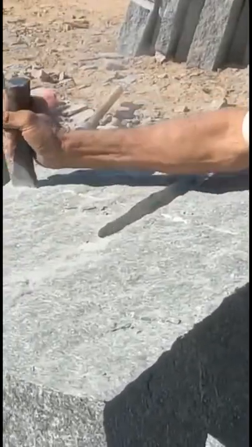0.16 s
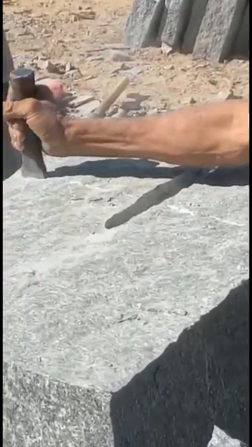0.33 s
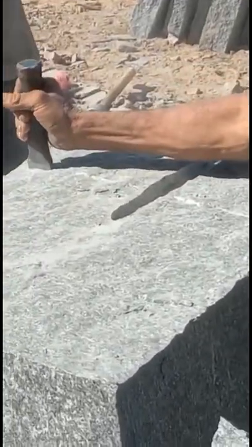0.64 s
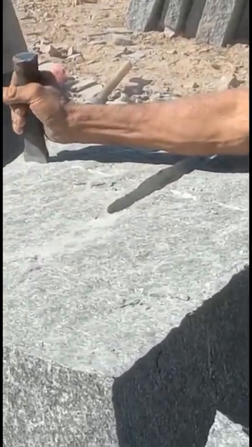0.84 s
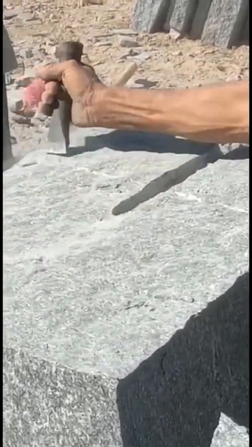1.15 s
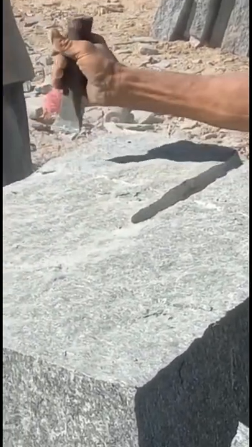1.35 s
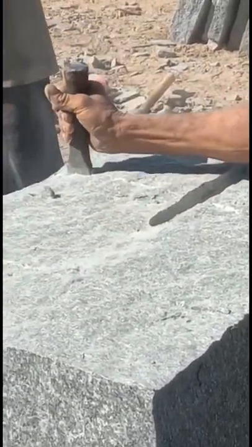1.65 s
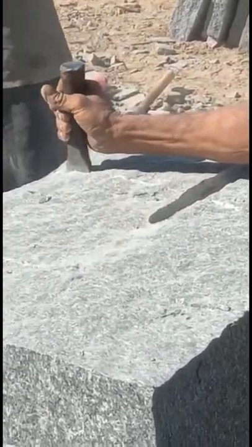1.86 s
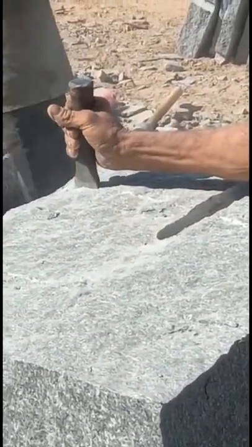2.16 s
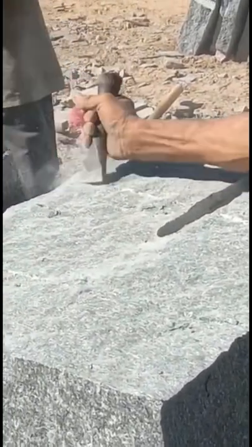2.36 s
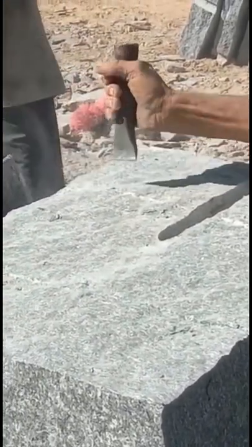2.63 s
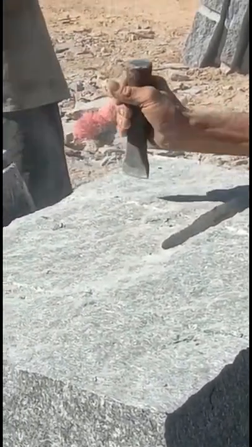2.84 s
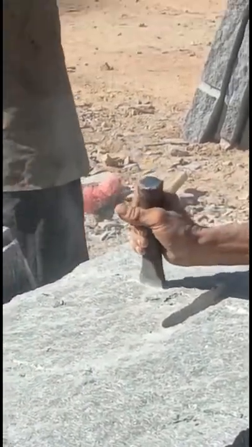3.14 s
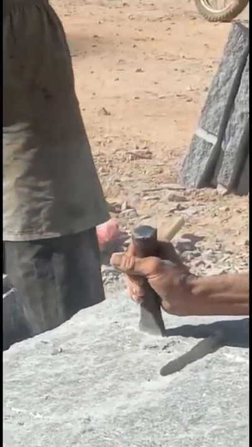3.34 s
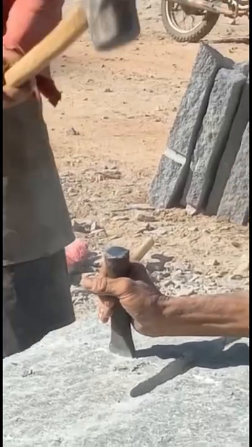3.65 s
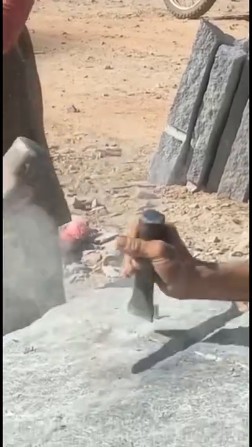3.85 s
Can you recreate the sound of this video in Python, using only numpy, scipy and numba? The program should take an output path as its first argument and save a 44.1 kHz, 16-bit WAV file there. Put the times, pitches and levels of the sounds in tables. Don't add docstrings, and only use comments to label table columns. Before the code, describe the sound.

Outdoor stone yard, close mono phone: a diesel compressor throbs low and hisses steadily some way off. The chisel clacks onto stone at 0.2 s. Sledgehammer blows crack at 1.0, 2.3 and 3.7 s, hard, clipped, with high steel ring, gritty stone crunch and brief diffuse scatter. The chisel taps at 1.1, 1.6 and 2.9-3.2; a chip clicks at 3.9. Nearby air hiss swells from about 3 s.

```python
import sys
import numpy as np
from scipy import signal
from scipy.io import wavfile
from scipy.ndimage import uniform_filter1d, minimum_filter1d
from numba import njit

SR = 44100
rng = np.random.default_rng(int(sys.argv[2]) if len(sys.argv) > 2 else 0)


def field_ratio(decibels):
    return 10 ** (np.asarray(decibels, dtype=float) / 20)


def generate_wav(sig):
    pcm = np.round(np.clip(np.atleast_2d(sig).T, -1, 1) * 32767).astype(np.int16)
    wavfile.write(sys.argv[1], SR, pcm)


N = 176400

# centre [Hz], width [Hz], level [dB].
HOUSING_MODES = [(44, 13, -20.5), (99, 15, -7), (140, 28, 0.5), (164.3, 12, -1), (258, 35, -7),
                 (320.4, 77, -7.5), (404, 31, -11), (471.6, 33, -4), (694, 50.4, -7.5), (862, 248, -12.5),
                 (1147, 57, -13.5), (1537, 730, -24)]
# centre [Hz], width [Hz], level [dB].
AIR_BANDS = [(2337, 205, 4.5), (3320, 2700, -9.5), (3890, 360, -1.5), (5660, 133, -3), (7500, 330, -11),
             (8230, 910, -4), (9500, 960, -5.5), (10350, 360, -2.5), (10970, 390, -2), (12300, 600, -4),
             (14000, 280, -21), (14500, 220, 1.5), (15300, 250, 0)]
# centre [Hz], width [Hz], level [dB].
JET_BANDS = [(2100, 590, -1.5), (3670, 1100, -5.5), (5720, 250, 1), (6740, 470, 1.5), (9200, 1400, -9.5),
             (15500, 1100, 1)]
# time [s], level [dB].
JET_FLOW_CURVE = [
    (0, -54),
    (2.4, -55),
    (2.9, -54),
    (3.3, -48),
    (3.55, -43),
    (3.8, -42),
    (4, -41),
]
# start [s], level [dB], second corner after [s], tick [dB],
# high modes [dB].
CHISEL_TAPS = [
    (0.2183, -20, 0.0059, -18, -24),
    (.325, -43, 0.0034, -10, -14),
    (1.0995, -23.5, .004, -18, -20),
    (1.5565, -27, .004, 0, 1),
    (1.605, -48, 0.0038, -7, -10),
    (1.662, -41.5, 0.0062, -8, -12),
    (2.9353, -25.5, .0035, -4, -17),
    (2.979, -56, 0.0034, 1, -1),
    (3.057, -40.5, 0.0088, -4, -14),
    (3.19, -49, 0.0033, 5, -10),
]
# frequency [Hz], level [dB], t60 [s].
CHISEL_MODES = [(4181, 0.5, 0.046), (2210, -6.5, 0.019), (934, -8, 0.023), (1390, -10, 0.017),
                (5670, -13, 0.014), (10050, -11, 0.064), (14700, -13, 0.076)]
# start [s], level [dB], crush length [s], scatter level [dB], scatter centre [Hz].
HAMMER_BLOWS = [
    (1.0348, -1.5, 0.0051, -26.5, 4300),
    (2.3326, -3.5, 0.012, -26, 4800),
    (3.7088, -4, 0.0079, -28.5, 2100),
]
STEEL_MODE_HZ = [1860, 2200, 4152, 5945, 6300, 7940, 8188, -8226, 10133, 10462, -12144, 12174, 14395, 14366]
# t60 [s], level in first, second and third blow [dB].
STEEL_MODES = [(0.049, -8, -6.5, -11), (0.034, -1.5, -6.5, -23), (0.065, 1, -8, -11), (0.022, -1.5, 3, -2),
               (0.05, -6.5, -4, -12), (0.16, -33, -17, -35), (0.27, -8.5, -9, -14), (0.3, -18.5, -22, -15),
               (0.12, -5.5, -7.5, -10), (0.18, -9.5, -4.5, -16), (.21, -36, -27, -8.5),
               (0.18, -38, -29, -8.5), (0.16, -23, -18, -4.5), (0.15, -26, -23, -19)]
# start [s], level [dB], t60 [s], frequency [Hz].
LATE_RINGS = [
    (1.0995, -30, .2, 4152),
    (2.366, -23, .17, 12174),
    (1.04, -26, .3, 10140),
    (1.045, -27, .3, 10455),
    (2.34, -26, .32, 10180),
    (2.345, -24, .3, 10455),
]
# centre [Hz], t60 [s], level in first, second and third blow [dB].
STONE_BANDS = [(130, 0.065, -9.5, -26, -10.5), (269, 0.049, -16, -15, -12.5), (535, 0.049, -8, -14.5, -7),
               (1140, 0.035, -12, -12, -10.5), (2060, 0.034, -8, -12, -12.5), (3500, 0.061, -9.5, -12, -6),
               (6260, 0.071, -6.5, -6.5, -9.5), (15200, 0.059, -15.5, -9, 1)]
# start [s], level [dB], length [s], centre [Hz],
# width [Hz].
CHIP_FALLS = [
    (3.8924, -18, 0.0031, 7200, 12000),
    (5.1, -27, 0.02, 3800, 5900),
    (1.29, -48.5, 0.074, 3500, 4200),
    (2.59, -49.5, 0.07, 5000, 5800),
    (3.73, -37.5, 0.12, 2200, 410),
    (2.9345, -25, 0.0046, 4600, 1000),
    (1.0985, -27, 0.0023, 2000, 2200),
]


def level(x, db):
    return x * field_ratio(db) / np.sqrt(np.mean(x ** 2))


def band(x, hz, width_hz):
    return signal.lfilter(*signal.iirpeak(min(hz, SR / 2.2), hz / width_hz, SR), x)


def hiss(hz, width_hz):
    once = band(rng.standard_normal(N), hz, width_hz)
    return level(band(once, hz, width_hz), 0)


def ring(x, hz, t60):
    pole = np.exp(2j * np.pi * hz / SR - np.log(1000) / (t60 * SR))
    return signal.lfilter([1], [1, -pole], x).imag


def click(start, db):
    x = np.zeros(N)
    x[int(start * SR)] = field_ratio(db)
    return x


def fade(start, hold, t60):
    t = np.arange(N) / SR - start
    onset = np.clip(t * 3000, 0, 1)
    return onset * field_ratio(-60 * np.clip(t - hold, 0, 1) / t60)


def walk(rate_hz):
    hold = int(SR / rate_hz)
    steps = np.repeat(rng.standard_normal(N // 40), hold)[:N]
    return 1.246 * uniform_filter1d(uniform_filter1d(steps, hold), hold)


@njit
def follow(x, release):
    y, e = np.empty(len(x)), 0.
    for i in range(len(x)):
        e = max(x[i], e * release)
        y[i] = e
    return y


def compressor():
    cycle_hz, jitter = 22.2, 0.006
    odd_firing_db, firing_scatter_db = -2, 3.5
    pulse_db, roar_db, air_db, puff_db = -40, -38, -47, 1.5

    phase = np.cumsum(cycle_hz * 2 * (1 + jitter * walk(12))) / SR
    firings = np.flatnonzero(np.diff(np.floor(phase)))
    uneven_db = firing_scatter_db * rng.standard_normal(400)[:len(firings)]
    pulses = np.zeros(N)
    pulses[firings] = field_ratio(uneven_db + odd_firing_db * (np.arange(len(firings)) % 2))

    thump, roar, air = 0, 0, 0
    for k, (hz, width, db) in enumerate(HOUSING_MODES):
        thump = thump + (-1) ** k * field_ratio(db) * band(pulses, hz, width) / np.sqrt(width)
        roar = roar + field_ratio(db + 2 * walk(7.4)) * hiss(hz, width * 1.74) * np.sqrt(width)
    for hz, width, db in AIR_BANDS:
        narrow = band(rng.standard_normal(N), hz, width * 0.64)
        air = air + field_ratio(db + 1.08 * walk(11)) * level(band(narrow, hz, width * 3), 0) * np.sqrt(width)
    puff = field_ratio(puff_db * np.cos(2 * np.pi * phase) + 1.7 * walk(2.3))
    return level(thump, pulse_db) + level(roar, roar_db) + level(air * puff, air_db)


def jet():
    rumble_hz, rumble_db = 95, 4
    air = sum(field_ratio(db + 1.9 * walk(12)) * hiss(hz, width * 1.7) * np.sqrt(width)
              for hz, width, db in JET_BANDS)
    rumble = level(np.diff(hiss(rumble_hz, 69), prepend=0), 0)
    rumble = field_ratio(rumble_db + 2.3 * walk(10)) * rumble
    flow_db = np.interp(np.arange(N) / SR, *np.array(JET_FLOW_CURVE).T)
    return (level(air, 0) + rumble) * field_ratio(flow_db)


def taps():
    thud_db = -9
    main_hz = CHISEL_MODES[0][0]
    noise = rng.standard_normal(N)
    dull, bright, tick = 0, 0, 0
    for start, db, gap, tick_db, high_db in CHISEL_TAPS:
        whole_gap = np.round(gap * main_hz) / main_hz
        touch = click(start, db) + click(start + whole_gap, db - 0.5)
        dull = dull + touch
        bright = bright + field_ratio(high_db) * touch
        tick = tick + field_ratio(db + tick_db) * noise * (fade(start, 0, 0.0099) + fade(start + gap, 0, 0.016))

    soft = level(ring(dull, main_hz, 0.004), 0) * np.std(dull) * field_ratio(-15)
    steel = 0
    for k, (hz, db, t60) in enumerate(CHISEL_MODES):
        push = soft if k == 0 else dull if k < 4 else bright
        steel = steel + field_ratio(db + 3) * ring(push, hz, t60)

    ticks = np.diff(tick, prepend=0) + 1.8 * band(tick, 4400, 2500)
    burst = uniform_filter1d(dull, size=120, origin=59) * 120 * noise
    return steel + ticks + field_ratio(thud_db) * band(burst, 1900, 1300)


def hammered_steel():
    wander_db, late_db = 1.2, -27
    out = 0
    for hz, (t60, *dbs) in zip(STEEL_MODE_HZ, STEEL_MODES):
        push = sum(click(blow[0], blow[1] + db) for db, blow in zip(dbs, HAMMER_BLOWS))
        wander = field_ratio(wander_db * walk(60) + 2.1 * walk(250))
        out = out + np.sign(hz) * wander * ring(push, abs(hz), t60)
    for start, db, t60, hz in LATE_RINGS:
        build_up = ring(click(start, 0), hz, 0.013)
        out = out + field_ratio(2.0 * walk(140)) * level(ring(build_up, hz, t60), db + late_db)
    return out


def cracking_stone():
    crisp_hz = 3030
    grit_db = 2 * walk(700)
    out = 0
    for hz, t60, *dbs in STONE_BANDS:
        shorter = min(1, crisp_hz / hz)
        crush = sum(field_ratio(db + blow[1]) * fade(blow[0], blow[2] * shorter, t60)
                    for db, blow in zip(dbs, HAMMER_BLOWS))
        out = out + crush * field_ratio(grit_db + 2.4 * walk(300)) * hiss(hz, min(hz * 0.81, 4500))
    return out


def yard_scatter():
    hold_s, t60_s, sag_s = 0.16, 0.29, 0.3
    out = 0
    for start, _, _, db, hz in HAMMER_BLOWS:
        far = level(band(rng.standard_normal(N), hz, hz * 0.94), db)
        out = out + far * fade(start, hold_s, t60_s) * fade(start, 0, sag_s)
    return out


def blows():
    low_cut = signal.butter(2, 90, "high", fs=SR, output="sos")
    return signal.sosfilt(low_cut, hammered_steel() + cracking_stone() + yard_scatter())


def chips():
    out = 0
    for start, db, length, hz, width in CHIP_FALLS:
        burst = level(band(rng.standard_normal(N), hz, width), db)
        out = out + fade(start, length / 2, length * 2) * field_ratio(3.2 * walk(605)) * burst
    return out


def scene():
    blow_drive_db = 4.5
    return (compressor() + jet() + taps() + field_ratio(blow_drive_db) * blows() + chips())[None]


def band_limit(x):
    return signal.sosfilt(signal.butter(12, 16520, fs=SR, output="sos"), x)


def record(dry):
    ceiling_db, ratio, ahead_s, release_s, top_hz = -2.5, 2.17, 0.03, 0.038, 15750
    k = int(ahead_s * SR)
    peak = follow(np.abs(dry[0]), np.exp(-1 / (release_s * SR)))
    over_db = np.clip(20 * np.log10(peak + 1e-9) - ceiling_db, 0, None)
    gain_db = -(1 - 1 / ratio) * over_db
    gain_db = minimum_filter1d(gain_db, k, origin=-(k // 2))
    gain_db = uniform_filter1d(gain_db, k, origin=(k - 1) // 2)
    top_cut = signal.ellip(8, 0.2, 60, top_hz, fs=SR, output="sos")
    mix = np.clip(signal.sosfilt(top_cut, dry * field_ratio(gain_db)), -1, 1)
    return band_limit(mix)


dry = scene()
out = record(dry)
generate_wav(out)
```